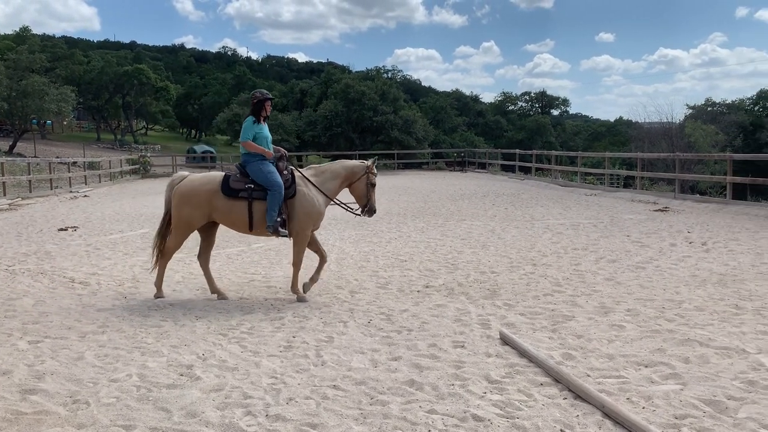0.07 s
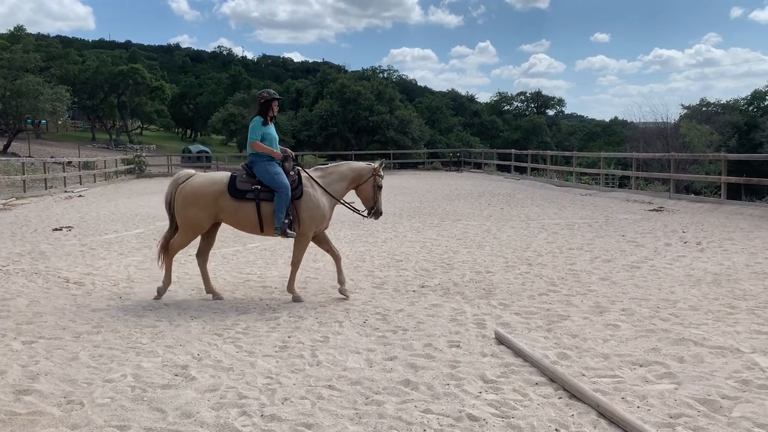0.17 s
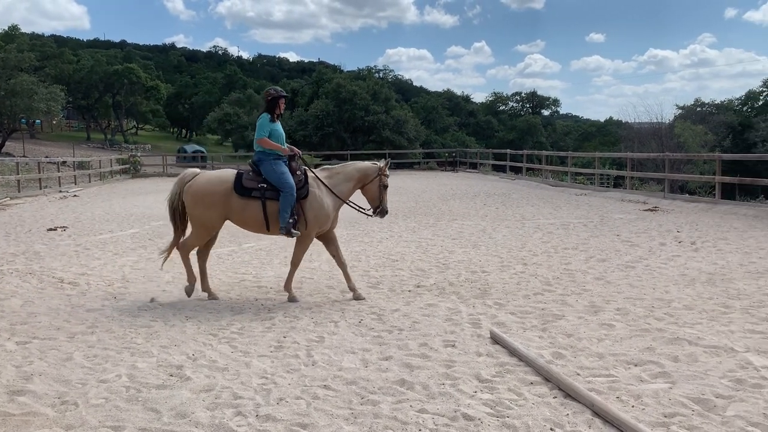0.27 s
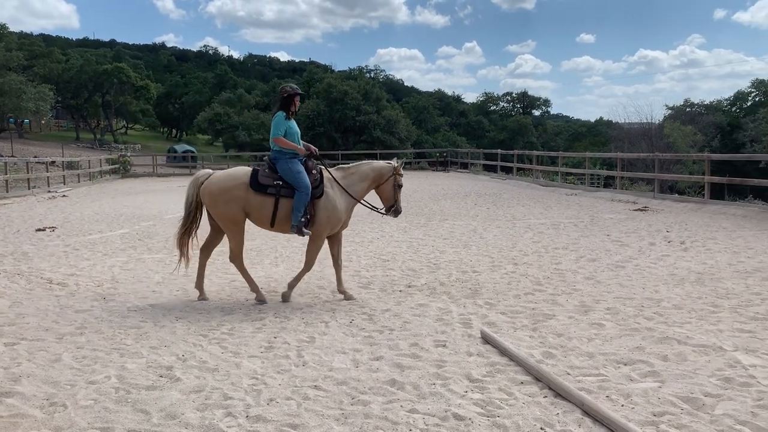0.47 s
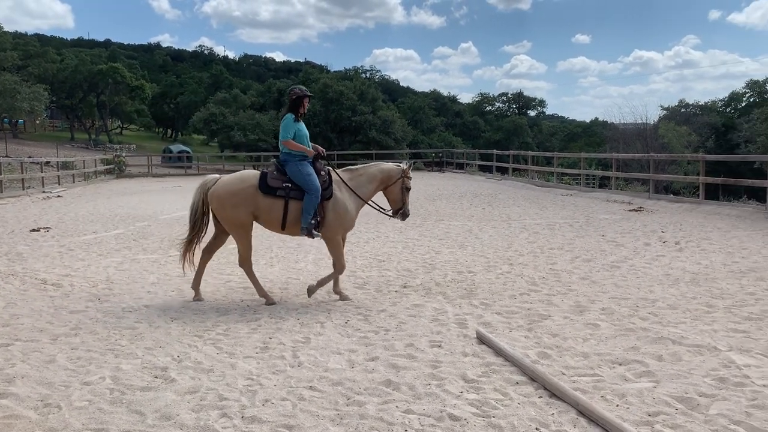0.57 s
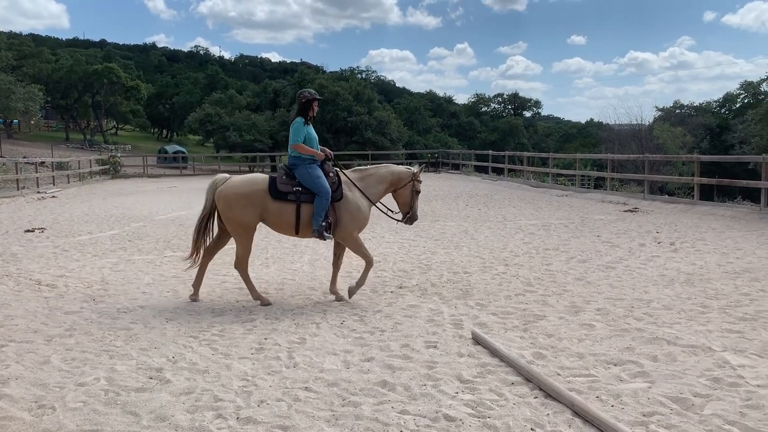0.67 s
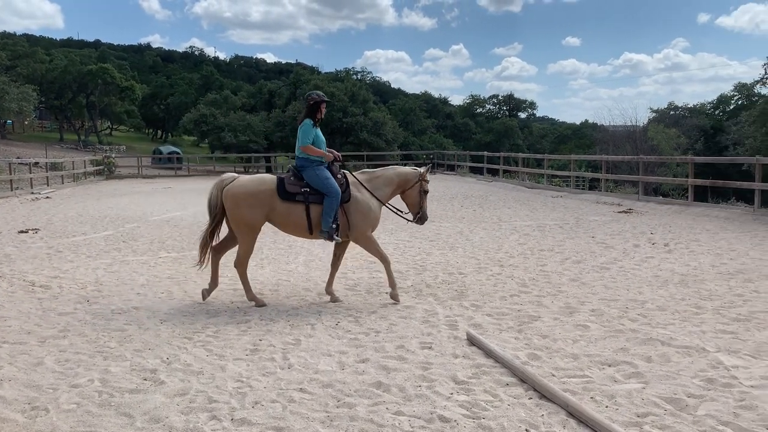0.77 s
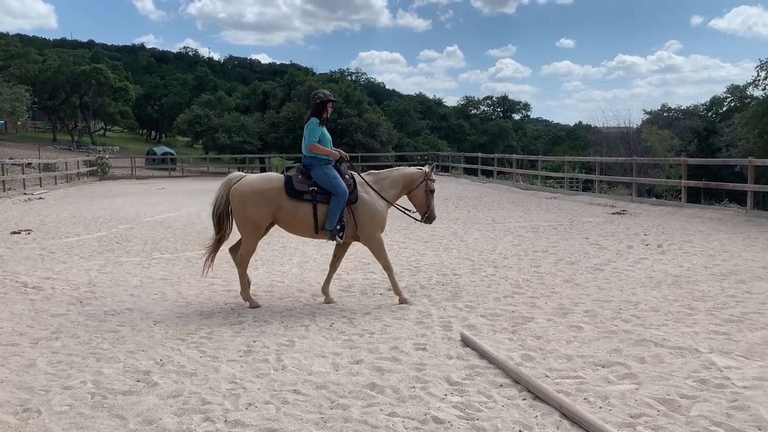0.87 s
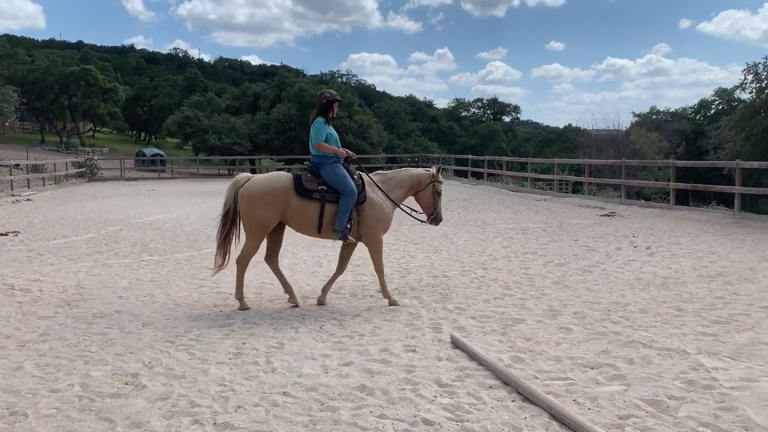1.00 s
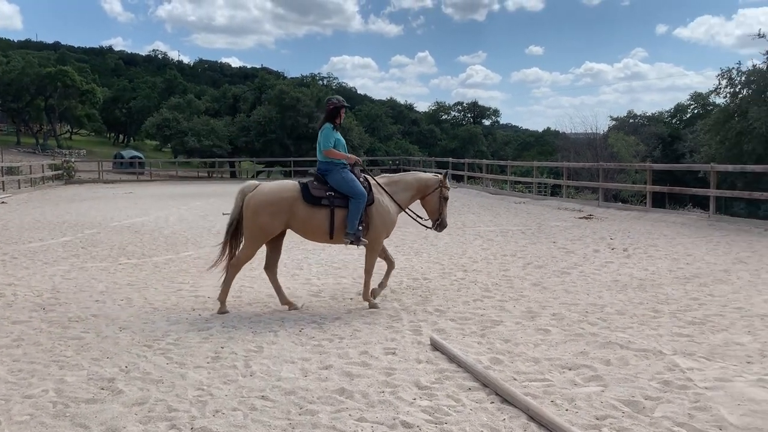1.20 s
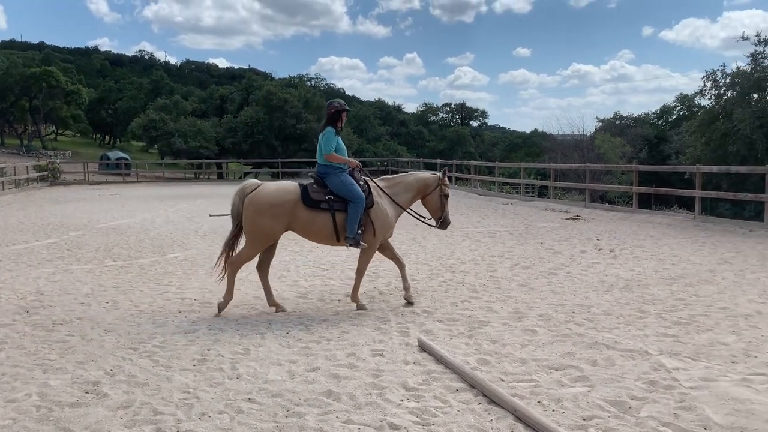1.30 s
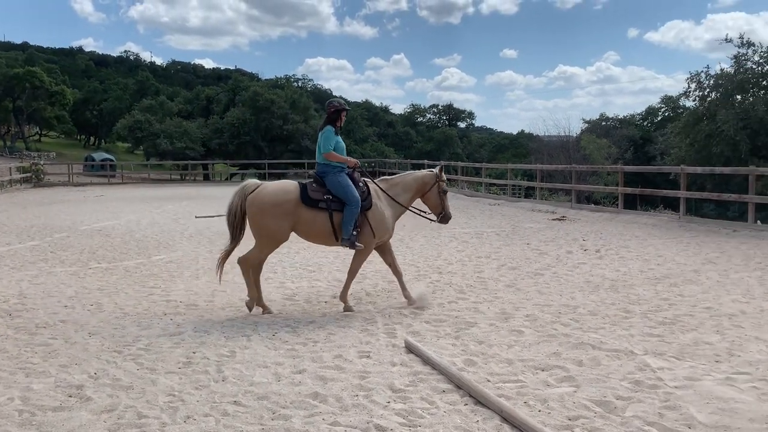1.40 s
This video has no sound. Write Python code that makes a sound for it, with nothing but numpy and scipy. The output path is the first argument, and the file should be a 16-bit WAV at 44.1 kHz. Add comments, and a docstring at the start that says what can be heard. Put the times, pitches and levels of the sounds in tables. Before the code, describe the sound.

Horse hoofsteps in sand, first a dragging scrape, then a cluster of dull thumps and a sharp click, a high bird whistle, softer steps after; outdoors, with wind and handling rumble on the stereo microphone.

```python
"""Horse stepping through soft sand

Hooves crunch and throw grit, made of dense random grains; the tack clicks in short noise bursts and rings.
Muffled low thumps, probably hoof thuds mixed with wind and handling on the microphone, are damped swings
on a gusty noise rumble. Over the quiet noise hiss of the open air a bird gives one thin, rising two-voiced
whistle, made of wavering sines; a second, far bird adds two short pips."""
import sys
import numpy as np
from scipy import signal
from scipy.fft import rfft, irfft
from scipy.io import wavfile
from scipy.ndimage import uniform_filter1d

SR = 44100
rng = np.random.default_rng(int(sys.argv[2]) if len(sys.argv) > 2 else 0)


def wrap_up_sound(samples):
    """Save the sound to the file named by the first command line argument, as 16-bit audio."""
    columns = np.atleast_2d(samples).T
    # keep every value between -1 and 1, then stretch to whole-number steps
    tamed = np.clip(columns, -1, 1)
    steps = np.round(tamed * 32767).astype(np.int16)
    wavfile.write(sys.argv[1], SR, steps)


N = 63945
T = np.arange(N) / SR


def from_db(db):
    """Decibels to gain."""
    return 10 ** (np.asarray(db) / 20)


def rms_one(x):
    """Scale to unit power."""
    return x / np.sqrt(np.mean(x ** 2) + 1e-20)


def in_time(rows):
    """Columns of a control curve at every sample."""
    s, *columns = np.transpose(rows)
    return [np.interp(T, s, column) for column in columns]


def pan(db):
    """Left and right gains; negative leans right."""
    return from_db([[db], [-db]])


def colour(x, spectrum):
    """Give a signal a smooth spectrum; unit power."""
    hz, db = np.transpose(spectrum)
    f = np.maximum(np.arange(N // 2 + 1) * SR / N, 1)
    # roll off an octave outside the first and last points
    low_edge = 1 + (hz[0] / 2 / f) ** 4
    high_edge = 1 + (f / hz[-1] / 2) ** 4
    edges = 1 / np.sqrt(low_edge * high_edge)
    curve = from_db(np.interp(np.log(f), np.log(hz), db))
    return rms_one(irfft(rfft(x) * edges * curve, N))


def stereo(pair, alike):
    """Two unrelated signals become a partly alike left and right."""
    alike = np.clip(alike, -1, 1)
    middle = np.sqrt(1 + alike) * pair[0]
    side = np.sqrt(1 - alike) * pair[1]
    return middle + side * np.array([[1], [-1]])


def noise(spectrum, alike):
    """Coloured stereo noise."""
    return colour(stereo(rng.standard_normal((2, N)), alike), spectrum)


def steady(x, size):
    """Even out the chance swells of a noise over a window of size samples."""
    return x / np.sqrt(uniform_filter1d(np.mean(x ** 2, axis=0), size) + 1e-9)


def drift(rate_hz):
    """Random wander, mostly slower than rate_hz, spread 1."""
    lowpass = signal.butter(2, rate_hz, fs=SR, output="sos")
    return rms_one(signal.sosfilt(lowpass, rng.standard_normal(N)))


def swell(s, rise_s, decay_s):
    """Rounded rise to a peak at s, then exponential decay."""
    before, after = np.minimum(T - s, 0), np.maximum(T - s, 0)
    return np.exp(-(before / rise_s) ** 2 - after / decay_s)


def push(s, hz, rise_s, decay_s):
    """A damped swing starting at s: linear rise, exponential decay."""
    age = np.maximum(T - s, 0)
    rise = np.minimum(age / rise_s, 1)
    decay = np.exp(-np.maximum(age - rise_s, 0) / decay_s)
    return np.sin(2 * np.pi * hz * age) * rise * decay


# rumble level as the gusts come and go: time_s, level_db
GUSTS = [(0, -55.5), (.06, -51.5), (.11, -48), (.17, -46.5), (.24, -38), (.36, -37.5), (.45, -45.5),
         (.56, -37.5), (.78, -40.5), (.93, -38.5), (1.04, -45.5), (1.13, -52.5), (1.2, -71), (1.27, -48.5),
         (1.45, -46)]
# rumble spectrum: frequency_hz, gain_db
RUMBLE = [(20, -24), (35, -2.5), (57, 2), (85, -7), (133, -13), (200, -28.5), (280, -66), (600, -70)]
RUMBLE_ALIKE = 0.55  # left-right likeness, 0 unrelated to 1 identical


def wind():
    """Gusts rumble on the microphone: low noise under a moving level."""
    rumble = steady(noise(RUMBLE, RUMBLE_ALIKE), size=1800)
    return from_db(in_time(GUSTS)[0]) * rumble


# hiss spectrum: frequency_hz, gain_db
AIR = [(100, 12.5), (300, -3.5), (550, -3), (850, -6), (1400, -11), (2300, -13), (3300, -21), (5000, -20),
       (10000, -25.5), (14000, -24.5), (16000, -53)]
# hiss level: time_s, level_db (before the pan)
AIR_LEVEL = [(0, -58), (.4, -58), (.65, -58.5), (.85, -65.5), (1.0, -67.5), (1.25, -57), (1.45, -63)]
AIR_ALIKE, AIR_PAN_DB = 0.43, -0.26


def open_air():
    """The far hiss of the open air: broad noise, slowly shifting in level."""
    return from_db(in_time(AIR_LEVEL)[0]) * noise(AIR, AIR_ALIKE) * pan(AIR_PAN_DB)


# the far bird's pips: peak_s, pitch_hz, level_db
FAR_PIPS = [(1.298, 2750, -71), (1.428, 2630, -68)]
PIP_S = 0.037  # rise and decay


def far_bird():
    """Two short pips: swelling sines with a wandering phase."""
    out = 0
    for s, hz, db in FAR_PIPS:
        tone = np.sin(2 * np.pi * hz * T + drift(83))
        out = out + from_db(db) * swell(s, PIP_S, PIP_S) * tone
    return out


BIRD_DB = 4.5  # lift on both of the near bird's voices


def whistle(rows, waver_hz, flicker_db, fade_s=0.014):
    """One wavering, nearly pure voice, faded just outside its first and last points."""
    hz, db = in_time(rows)
    inside_s = np.minimum(T - rows[0][0], rows[-1][0] - T)
    gate = np.clip(inside_s / fade_s + 1, 0, 1)
    phase = 2 * np.pi * np.cumsum(hz + waver_hz * drift(157)) / SR
    level = from_db(BIRD_DB + db + flicker_db * drift(120))
    return np.sqrt(2) * gate * level * np.sin(phase)


# the bird's two voices: time_s, pitch_hz, level_db (before the lift, the pan and the lower voice's trill)
UPPER_VOICE = [(0.43, 6080, -87), (0.448, 6170, -66.5), (0.482, 6260, -60), (0.53, 6200, -66.5),
               (0.558, 6490, -60.5), (0.592, 6460, -66), (0.61, 6510, -55.5), (0.654, 6563, -60),
               (0.662, 6640, -70.5), (0.68, 6920, -60.5), (0.698, 6920, -57), (0.715, 6920, -82)]
LOWER_VOICE = [(0.468, 5300, -74), (0.49, 5220, -65.5), (0.51, 5420, -66.5), (0.552, 5440, -72),
               (0.585, 5390, -71.5), (0.607, 5240, -64), (0.624, 5270, -82)]
TRILL_PER_S, TRILL_DB = 54, 3.5
BIRD_PAN_DB = -3
BIRD_ECHO_DB, BIRD_ECHO_T60_S = -16, 1.4


def bird():
    """Two voices from the right, the lower trilling in level, scattered back by the trees as decaying noise."""
    trill = from_db(TRILL_DB * np.sin(2 * np.pi * TRILL_PER_S * T + drift(14)))
    upper = whistle(UPPER_VOICE, waver_hz=35, flicker_db=1.5)
    lower = trill * whistle(LOWER_VOICE, waver_hz=55, flicker_db=1.5)
    call = upper + lower
    trees = rng.standard_normal((2, N)) * from_db(-60 * T / BIRD_ECHO_T60_S)
    trees = rms_one(trees) / np.sqrt(N)
    echo = signal.fftconvolve(call[None], trees, axes=1)[:, :N]
    return call * pan(BIRD_PAN_DB) + from_db(BIRD_ECHO_DB) * echo


# muffled thumps: start_s, level_db (before softening), pitch_hz, flutter_db
THUMPS = [(0.268, -17.5, 71.2, -32), (0.296, -22.5, 121, -30.5), (0.3179, -28, 153, -26.5),
          (0.332, -22.5, 78.2, -33), (0.498, -26.5, 74, -47), (0.515, -24.5, 60.4, -51.5),
          (0.5332, -22.5, 81, -79), (0.604, -33, 92, -54), (0.636, -26.5, 58.5, -50),
          (0.705, -27.5, 59, -44), (0.724, -36, 115.5, -43), (0.817, -29.5, 92.4, -38),
          (0.831, -27, 151.7, -48.5), (0.851, -22, 58.6, -83), (0.884, -30.5, 58.4, -57.5),
          (0.925, -28.5, 54, -74), (1.147, -35.5, 62, -65), (1.16, -32.5, 58.5, -91), (1.196, -35, 51, -83),
          (1.423, -38.5, 94.6, -56.5)]
THUMP_RISE_S, THUMP_DECAY_S = 0.0049, 0.015
THUMP_SCATTER_S = 0.0016  # each side is hit at a slightly different moment
THUMP_SOFT_HZ = 208  # each push is dulled above this frequency
# flutter spectrum: frequency_hz, gain_db
FLUTTER = [(40, -6.5), (110, -2), (195, 4), (260, -14), (330, -17), (430, -20.5), (600, -37.5), (1000, -60)]
FLUTTER_RISE_S, FLUTTER_DECAY_S, FLUTTER_ALIKE = 0.0094, 0.0094, 0.9
# dull hollow knocks: start_s, level_db, pitch_hz
KNOCKS = [(0.3225, -35.5, 410), (0.334, -42, 574), (0.373, -49.5, 1235), (0.728, -57, 460),
          (0.829, -59.5, 600), (0.983, -45.5, 432)]
CONTACT_RISE_S, KNOCK_DECAY_S = 0.00033, 0.0025  # the clicks and clinks share this rise


def thumps():
    """Each thump is a soft low push with a short noise flutter; hollow knocks fall among them."""
    pushes, flutter = np.zeros((2, N)), 0
    skews_s = THUMP_SCATTER_S * rng.uniform(-0.69, 1, len(THUMPS))
    for (s, db, hz, flutter_db), skew_s in zip(THUMPS, skews_s):
        left = push(s - skew_s, hz, THUMP_RISE_S, THUMP_DECAY_S)
        right = push(s + skew_s, hz, THUMP_RISE_S, THUMP_DECAY_S)
        pushes -= from_db(db) * np.array([left, right])
        shape = swell(s + FLUTTER_RISE_S, FLUTTER_RISE_S, FLUTTER_DECAY_S)
        flutter = flutter + from_db(flutter_db) * shape
    pushes = signal.sosfilt(signal.butter(3, THUMP_SOFT_HZ, fs=SR, output="sos"), pushes)
    knocks = sum(from_db(db) * push(s, hz, CONTACT_RISE_S, KNOCK_DECAY_S) for s, db, hz in KNOCKS)
    return pushes + knocks + flutter * steady(noise(FLUTTER, FLUTTER_ALIKE), size=500)


# short hard clicks of tack and grit: peak_s, body_db, ping_db (before the horse's pan)
CLICKS = [(0.062, -58, -79), (0.2085, -64, -47), (0.375, -56, -52), (0.3963, -56.5, -72), (0.407, -71, -59),
          (0.452, -64, -45.5), (0.4583, -68, -55), (0.475, -60, -48), (0.5094, -52, -38),
          (0.779, -63.5, -52), (0.9986, -71, -52.5), (1.0895, -57.5, -69), (1.3541, -66, -47.5),
          (1.3756, -66, -38)]
# spectra of the click's body and its brighter ping: frequency_hz, gain_db
CLICK_BODY = [(500, -44), (1000, 1), (1550, 13.5), (3200, -1.5), (5000, -7), (8000, -2), (15000, -61)]
CLICK_PING = [(2000, -43), (4000, -2.5), (6500, -3), (10000, 2), (13200, -1), (16000, -2)]
CLICK_DECAY_S, CLICK_TAIL_DB, CLICK_TAIL_S = 0.0012, -15.5, 0.013
# briefly ringing buckles: start_s, level_db (before the horse's pan), pitch_hz
CLINKS = [(0.5103, -50.5, 1547), (1.352, -55.5, 2880), (1.3774, -48.5, 3910), (1.375, -40, 9230)]
CLINK_CYCLES = 15.7  # cycles per decay constant
SAND_ALIKE = 0.38  # left-right likeness of clicks and sand


def clicks():
    """Short hard contacts: a brief noise rattle with a faint tail; a few buckles ring as damped sines."""
    body = steady(noise(CLICK_BODY, SAND_ALIKE), size=60)
    ping = steady(noise(CLICK_PING, SAND_ALIKE), size=60)
    out = sum(from_db(db) * push(s, hz, CONTACT_RISE_S, CLINK_CYCLES / hz) for s, db, hz in CLINKS)
    for s, body_db, ping_db in CLICKS:
        tail = from_db(CLICK_TAIL_DB) * swell(s, CONTACT_RISE_S, CLICK_TAIL_S)
        shape = swell(s, CONTACT_RISE_S, CLICK_DECAY_S) + tail
        out = out + shape * (from_db(body_db) * body + from_db(ping_db) * ping)
    return out


# hard cracks, as of a hoof on a pebble: start_s, level_db (before the horse's pan), final_pitch_hz
CRACKS = [(0.5100, -30.5, 1600), (1.0911, -45, 3100)]
CRACK_START_HZ, CRACK_FALL_S, CRACK_RISE_S, CRACK_DECAY_S = 12000, 0.00022, 0.0007, 0.0005


def cracks():
    """Each crack sweeps from the treble nearly down to its final pitch within about a millisecond."""
    out = 0
    for s, db, hz in CRACKS:
        fall = np.exp(-np.maximum(T - s, 0) / CRACK_FALL_S)
        sweep_hz = (T > s) * (hz + (CRACK_START_HZ - hz) * fall)
        tone = np.sin(2 * np.pi * np.cumsum(sweep_hz) / SR)
        out = out + from_db(db) * swell(s + CRACK_RISE_S, CRACK_RISE_S, CRACK_DECAY_S) * tone
    return out


GRAINS_PER_S, GRAIN_SPREAD_DB = 1900, 3
CLUMP_HZ, CLUMP_DB = 150, 2  # the sand breaks in clumps


def grains(spectrum):
    """Dense tiny impacts of sand, uneven in size, their level wandering in clumps."""
    spread_db = GRAIN_SPREAD_DB * np.minimum(rng.exponential(1, (2, N)), 4)
    sizes = from_db(spread_db + CLUMP_DB * drift(CLUMP_HZ)) * rng.choice([-1, 1], (2, N))
    hits = rng.random((2, N)) < GRAINS_PER_S / SR
    return colour(stereo(sizes * hits, SAND_ALIKE), spectrum)


# hoof scuffs: peak_s, rise_s, decay_s, crunch_db, spray_db (levels before the horse's pan)
SCUFFS = [(0.124, 0.0081, 0.021, -52.5, -71), (0.178, 0.0098, 0.024, -52.5, -66),
          (0.318, 0.015, 0.031, -59.5, -62), (0.479, 0.021, 0.055, -66.5, -57),
          (0.52, 0.018, 0.017, -59, -60), (0.604, 0.014, 0.032, -63.5, -69.5),
          (0.701, 0.012, 0.045, -69, -69.5), (0.895, 0.031, 0.04, -72.5, -67.5),
          (1.003, 0.05, 0.054, -72, -75), (1.062, 0.036, 0.079, -70, -72.5),
          (1.151, 0.014, 0.033, -65.5, -71), (1.358, 0.0059, 0.04, -66, -59),
          (1.431, 0.026, 0.03, -63.5, -70.5)]
# spectra of the sand's crunch and its fine spray: frequency_hz, gain_db
CRUNCH = [(300, -5.5), (560, -4), (900, 2.5), (1400, 1.5), (2200, -0.5), (3700, -3), (5300, -10),
          (10000, -34)]
SPRAY = [(900, -14.5), (1700, 4), (3000, -4.5), (5000, -2.5), (7500, 3), (10000, -1), (13500, -1),
         (16000, -18)]
# level of one dragging scrape: time_s, level_db (before the horse's pan)
SCRAPE = [(.04, -71), (.08, -62), (.135, -56.5), (.155, -59.5), (.18, -49.5), (.205, -59.5), (.25, -64),
          (.29, -96)]
# the scrape's hollow ring: frequency_hz, gain_db
SCRAPE_RING = [(600, -10.5), (830, 2.5), (950, -16), (1080, -7), (1300, -29.5)]


def scuffs():
    """A hoof crunches into the sand and throws a fine spray of grains; the first step drags."""
    crunch, spray = grains(CRUNCH), grains(SPRAY)
    steps = 0
    for s, rise_s, decay_s, crunch_db, spray_db in SCUFFS:
        sand = from_db(crunch_db) * crunch + from_db(spray_db) * spray
        steps = steps + swell(s, rise_s, decay_s) * sand
    return steps + from_db(in_time(SCRAPE)[0]) * grains(SCRAPE_RING)


HORSE_PAN_DB = -1


def scene():
    """Horse, wind and birds together."""
    horse = (scuffs() + clicks() + cracks()) * pan(HORSE_PAN_DB)
    return horse + thumps() + wind() + open_air() + bird() + far_bird()


# the recorder's stereo processing, phase lag of the right side behind the left: frequency_hz, lag_radians
STEREO_PHASE = [(110, 0), (260, 1.8), (530, 6.2), (650, 7.5), (770, 10.6), (1070, 14.3), (1350, 12.8),
                (2000, 12.6), (6200, 17.6), (8300, 16.4), (9900, 19), (13500, 12.3)]


def spread_phase(x):
    """The recorder's stereo processing turns the phase of the right side against the left, by frequency."""
    hz, radians = np.transpose(STEREO_PHASE)
    lag = np.interp(np.arange(N + 1) * SR / (2 * N), hz, radians)
    right = irfft(rfft(x[1], 2 * N) * np.exp(-1j * lag))[:N]
    return np.array([x[0], right])


LOW_CUT_HZ, TREBLE_EDGE_HZ, CUTOFF_HZ = 7.6, 13100, 16400
NOTCH_HZ, NOTCH_Q = 11780, 9


def record(dry):
    """The recorder spreads the sides in phase and thins deepest bass, a narrow treble band and top treble."""
    spread = spread_phase(dry)
    thinned = signal.sosfilt(signal.butter(1, LOW_CUT_HZ, "high", fs=SR, output="sos"), spread)
    thinned = signal.lfilter(*signal.iirnotch(NOTCH_HZ, NOTCH_Q, fs=SR), thinned)
    thinned = signal.sosfilt(signal.butter(8, TREBLE_EDGE_HZ, fs=SR, output="sos"), thinned)
    return signal.sosfilt(signal.cheby2(12, 70, CUTOFF_HZ, fs=SR, output="sos"), thinned)


dry = scene()
out = record(dry)
wrap_up_sound(out)
```